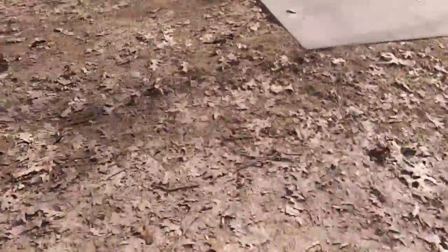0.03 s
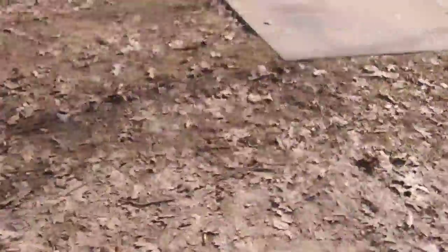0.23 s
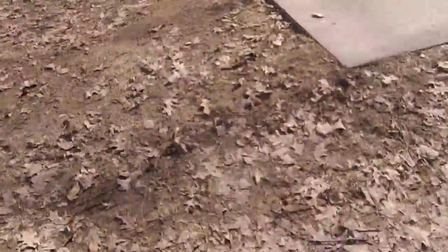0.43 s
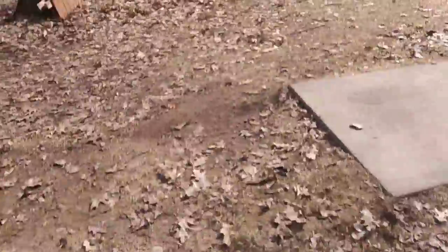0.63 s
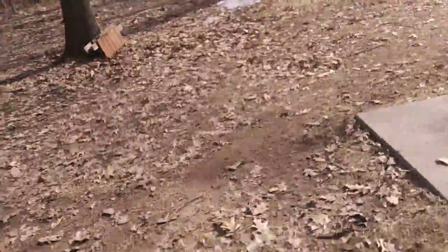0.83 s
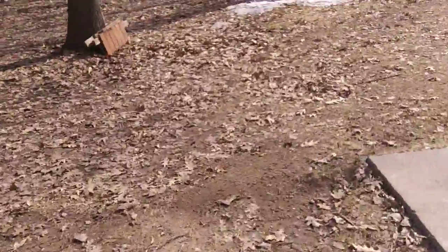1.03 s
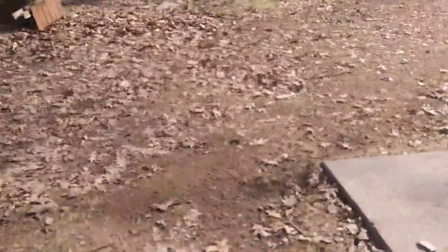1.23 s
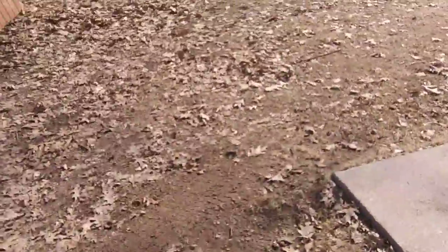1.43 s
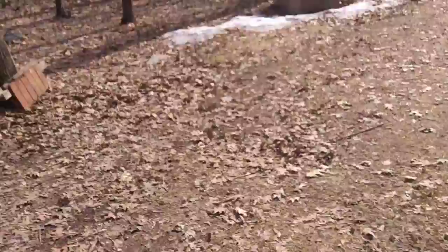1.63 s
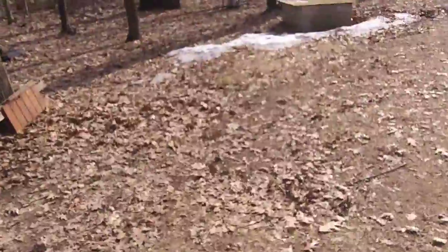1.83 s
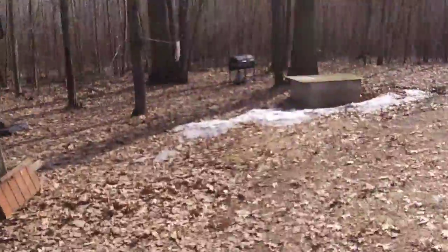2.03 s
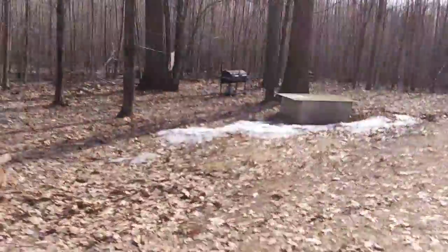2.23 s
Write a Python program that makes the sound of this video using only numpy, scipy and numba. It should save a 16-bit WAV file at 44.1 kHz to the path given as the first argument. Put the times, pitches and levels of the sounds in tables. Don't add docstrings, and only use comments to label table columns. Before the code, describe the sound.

Footsteps crunch dry leaves in a quiet leafy yard. A small click near 0.1 s precedes a sharp crunch at 0.23 and a duller, lower one around 0.37. From 0.55 to 1.4 s, brittle stems snap in irregular ticks. Soft rustling swells near 1.7, a firm crunch comes at 1.98, and a bright, chattering tread lands around 2.23. Thin small-microphone sound, faint hiss.

```python
import sys
import numpy as np
from scipy import signal
from scipy.fft import rfft, irfft
from scipy.io import wavfile
from numba import njit

SR = 44100
rng = np.random.default_rng(int(sys.argv[2]) if len(sys.argv) > 2 else 0)


def waveform_to_disk(signal):
    frames = np.transpose(np.atleast_2d(signal))
    scaled = np.clip(frames, -1, 1) * 32767
    samples = np.round(scaled).astype(np.int16)
    wavfile.write(sys.argv[1], SR, samples)


def voltage_ratio(decibels):
    exponent = np.asarray(decibels, float) / 20
    return 10 ** exponent


N = 100592


def highpass(x, hz, q):
    w = 2 * np.pi * hz
    b, a = signal.bilinear([1, 0, 0], [1, w / q, w * w], SR)
    return signal.lfilter(b, a, x)


@njit
def ring(n, start, step, decay, rise, size):
    y = np.zeros(n)
    for k in range(len(start)):
        z, soft = size[k] + 0j, 1.
        turn, soft_fall = np.exp(1j * step[k] - decay[k]), np.exp(-1 / rise[k])
        for i in range(start[k], min(start[k] + int(5 / decay[k]), n)):
            y[i] += z.imag * (1 - soft)
            z, soft = z * turn, soft * soft_fall
    return y


# (peak time [s], level [dB], rise [s per 20 dB], fall [s per 20 dB], centre [Hz])
CRUSHED_LEAVES = [(.005, -43, .01, .05, 300), (.228, -26, .012, .025, 2500), (.21, -43, .06, .03, 3600),
                  (.241, -37, .02, .025, 2400), (.23, -42, .12, .08, 450), (.278, -42, .04, .05, 800),
                  (.36, -32, .07, .03, 900), (.375, -31, .02, .02, 700), (.46, -44, .07, .04, 2200),
                  (.92, -58, .06, .04, 1700), (1.5, -55, .4, .6, 4200), (1.75, -49, .03, .2, 180),
                  (1.968, -42, .01, .03, 900), (1.995, -37, .02, .009, 3200), (1.71, -44, .05, .07, 3300),
                  (1.632, -50, .005, .03, 700), (.412, -38, .08, .03, 800), (.452, -38, .04, .05, 700),
                  (.08, -56, .3, .3, 4000), (.65, -45, .03, .06, 600), (.73, -42, .04, .08, 900),
                  (.815, -46, .08, .03, 1200), (.96, -50, .03, .06, 900), (1.17, -48, .05, .03, 2000),
                  (1.205, -41, .015, .1, 2800), (1.26, -42, .05, .06, 2500), (1.31, -41, .01, .02, 1200),
                  (1.35, -48, .02, .05, 2000), (1.562, -48, .02, .05, 3000), (1.638, -46, .015, .08, 4000),
                  (1.668, -44, .04, .1, 4200), (1.828, -44, .02, .07, 2600), (1.983, -37, .02, .03, 2600),
                  (2.05, -51, .06, .12, 500), (2.185, -38, .04, .08, 2600), (2.208, -36, .02, .015, 1800),
                  (2.248, -32, .035, .035, 2200), (2.24, -44, .1, .05, 450)]
# (peak time [s], level [dB], rise [s per 20 dB],
# fall [s per 20 dB], centre [Hz])
CHATTERING_LEAVES = [(2.23, -17, .025, .004, 4800), (2.243, -22, .03, .02, 4800),
                     (2.263, -25, .03, .025, 4100), (2.28, -28, .02, .02, 4800),
                     (2.185, -32, .045, .05, 4700), (2.245, -30, .09, .07, 6300),
                     (1.988, -31, .03, .025, 6200), (1.7, -37, .12, .08, 6800),
                     (.227, -30, .012, .006, 6500), (.234, -25, .004, .01, 3700),
                     (2.06, -44, .12, .05, 4900), (2.1, -38, .006, .006, 3500),
                     (2.127, -36, .003, .004, 4000)]
# (peak time [s], level [dB], rise [s per 20 dB], fall [s per 20 dB])
EDGE_RUSTLES = [(.0, -50, .01, .15), (.229, -34, .02, .012), (.378, -39, .09, .04), (.46, -44, .08, .06),
                (.75, -54, .3, .3), (.96, -52, .04, .05), (1.22, -49, .03, .25), (1.36, -46, .04, .12),
                (1.57, -47, .15, .08), (1.7, -36, .13, .1), (1.86, -43, .1, .1), (1.99, -31, .05, .025),
                (2.04, -45, .05, .12), (2.25, -35, .13, .1)]
GRAIN_COUNT, GRAIN_CYCLES = 60000, 2.5
GRAIN_GAIN_DB, GRAIN_SCATTER_DB = -3.5, 2.8
CLUMP_DB, CLUMPS_PER_S = 2.2, 300
SPREAD_OCT, CHATTER_OCT, RUSTLE_HZ = .85, .14, 11500
SKIRT_DB, SKIRT_FALL = -13, 2.2
LITTER_DB, LITTER_HZ, THIN_HZ = -63, 450, 280
CLOUD_DB, CLOUD_RISE_S, CLOUD_LONGER = -12, .002, 1.2


def crunch():
    u = rng.random((GRAIN_COUNT, 4)).T
    t = u[0] * N / SR
    hz = 150 + 16000 * u[1] ** 2

    def bell(centre, octaves):
        return np.exp(-np.log2(hz / centre) ** 2 / (2 * octaves ** 2))

    def near(centre, octaves=SPREAD_OCT):
        skirt = np.minimum(hz / centre, 1) / (1 + hz / centre / SKIRT_FALL)
        return bell(centre, octaves) + voltage_ratio(SKIRT_DB) ** 2 * skirt

    def swell(s, db, rise, fall):
        return voltage_ratio(db - 20 * np.where(t < s, (s - t) / rise, (t - s) / fall)) ** 2

    power = voltage_ratio(LITTER_DB) ** 2 * near(LITTER_HZ)
    for *shape, centre_hz in CRUSHED_LEAVES:
        power = power + swell(*shape) * near(centre_hz)
    for shape in EDGE_RUSTLES:
        power = power + swell(*shape) * near(RUSTLE_HZ, SPREAD_OCT / 2)
    for s, db, centre_hz, t60_ms in RINGING_LEAVES[1:]:
        cloud = swell(s, db + CLOUD_DB, CLOUD_RISE_S, CLOUD_LONGER * t60_ms / 1000)
        power = power + cloud * near(centre_hz)
    for *shape, centre_hz in CHATTERING_LEAVES:
        power = power + swell(*shape) * bell(centre_hz, CHATTER_OCT)

    scatter = voltage_ratio(GRAIN_GAIN_DB - GRAIN_SCATTER_DB * np.log(1.002 - u[2])) * np.sign(u[3] - .5)
    clump_gain = voltage_ratio(CLUMP_DB * rng.standard_normal((N // 100, 8)))
    clump = clump_gain[(t * CLUMPS_PER_S).astype(int), np.log2(hz / 100).astype(int)]
    tilt = (hz / 1000) ** .25 * np.minimum(hz / THIN_HZ, 1)
    size = clump * np.sqrt(power) * tilt * scatter
    start = (t * SR).astype(np.int64)
    return ring(N, start, 2 * np.pi * hz / SR, 2 * hz / SR / GRAIN_CYCLES, SR / hz / 2, size)


# (time [s], push level [dB], push length [ms], crack level [dB])
SNAPPING_STEMS = [(0.5447, -29, 0.27, -55), (0.5758, -33, 0.2, -57), (0.5843, -27, 0.29, -57),
                  (0.5965, -29, 0.35, -57), (0.5983, -24, 0.27, -51), (0.5996, -22, 0.2, -44),
                  (0.6142, -44, 0.2, -68), (0.6373, -32, 0.16, -58), (0.6464, -33, 0.35, -59),
                  (0.6487, -38, 0.16, -58), (0.6511, -37, 0.35, -57), (0.6596, -40, 0.11, -61),
                  (0.6698, -21, 0.16, -53), (0.6743, -33, 0.16, -46), (0.6834, -22, 0.16, -37),
                  (0.7138, -23, 0.16, -39), (0.7163, -13, 0.18, -33), (0.7305, -22, 0.16, -39),
                  (0.7361, -33, 0.18, -59), (0.752, -15, 0.16, -27), (0.7583, -31, 0.14, -40),
                  (0.7682, -33, 0.14, -41), (0.7816, -29, 0.14, -40), (0.7864, -29, 0.16, -41),
                  (0.8272, -34, 0.25, -41), (0.8288, -32, 0.14, -40), (0.8329, -17, 0.16, -31),
                  (0.8722, -40, 0.25, -61), (0.9423, -19, 0.2, -57), (0.9913, -18, 0.16, -29),
                  (1.028, -15, 0.18, -37), (1.0398, -39, 0.18, -54), (1.0475, -32, 0.14, -40),
              (1.0612, -42, 0.07, -50), (1.0707, -16, 0.14, -26), (1.1355, -21, 0.14, -32),
              (1.1391, -20, 0.16, -31), (1.1531, -23, 0.18, -41), (1.1785, -24, 0.16, -47),
              (1.1886, -12, 0.16, -52), (1.2012, -26, 0.14, -38), (1.261, -27, 0.14, -48),
              (1.2972, -38, 0.11, -45), (1.3089, -34, 0.14, -60), (1.3456, -37, 0.05, -42),
              (1.3487, -29, 0.07, -37), (1.3506, -17.5, 0.11, -38), (1.3566, -33, 0.16, -51),
              (1.3645, -32, 0.14, -51), (1.3682, -36, 0.16, -55), (1.3718, -34, 0.07, -43),
              (1.3789, -33, 0.05, -39), (1.5631, -28, 0.07, -44), (1.8094, -39, 0.07, -41),
              (1.8186, -52, 0.07, -45), (1.9312, -28, 0.07, -32), (2.066, -36, 0.07, -37),
              (2.1076, -36, 0.05, -36), (2.1266, -40, 0.11, -46), (2.2101, -20, 0.14, -31)]
# (time [s], push level [dB], push length [ms], crack level [dB])
KNOCKED_TWIGS = [
    (.3636, -28, .22, -60),
    (.4507, -30, .4, -70),
    (1.9803, -18, .2, -50),
    (2.2452, -22, .14, -45),
    (2.2476, -23, .22, -50),
    (.3793, -31, .2, -60),
    (.9835, -42, .15, -55),
    (.9865, -40, .2, -58),
    (1.6085, -40, .1, -60),
    (1.5565, -35, .14, -52),
]
PUSH_RISE, PUSH_FALL, SMEAR_MS = .75, 1.9, .105
DULL_MS_PER_DB = .0025
CRACK_GAIN_DB = 14


def snaps():
    y, k = np.zeros(N), np.arange(-64, 65)
    for s, db, ms, crack_db in [*SNAPPING_STEMS, *KNOCKED_TWIGS]:
        at = int(s * SR)
        late = k - s * SR % 1
        ms = max(ms - SMEAR_MS + DULL_MS_PER_DB * (db - crack_db), .03)
        width = ms * SR / 1000 * np.where(late < 0, PUSH_RISE, PUSH_FALL)
        y[at + k] += voltage_ratio(db) * (1 + ms / .25) * np.exp(-(late / width) ** 2)
        crack = (np.sinc(late) - .25 * np.sinc(late * .25)) * np.hanning(len(k))
        y[at + k] += voltage_ratio(crack_db + CRACK_GAIN_DB) * crack
    return highpass(y, 330, .85)


# (time [s], peak level [dB], pitch [Hz], t60 [ms])
RINGING_LEAVES = [(.077, -20, 4570, 7), (.103, -41, 4200, 6), (.111, -31, 3200, 4), (.2287, -10, 4300, 4),
                  (.2282, -16, 3300, 5), (.3697, -18, 1200, 4), (.3722, -23, 900, 5), (.445, -34, 900, 8),
                  (1.755, -42, 210, 40), (1.71, -46, 200, 40), (1.775, -36, 5400, 5), (2.21, -18, 6400, 5),
                  (1.9535, -43, 4100, 8), (.8715, -44, 4500, 6), (1.73, -38, 3500, 5),
                  (1.171, -21, 3200, 4), (1.1712, -24, 2000, 4), (1.4825, -38, 3000, 8),
                  (1.673, -30, 1240, 14), (1.6865, -29, 4700, 7), (1.734, -34, 210, 40),
                  (1.775, -34, 1100, 8), (1.776, -33, 3440, 6), (1.8195, -35, 460, 15),
                  (1.848, -30, 1620, 10), (1.9165, -37, 4080, 7), (1.946, -37, 1900, 7),
                  (1.979, -27, 1200, 5), (2.248, -27, 2500, 12), (2.2475, -30, 480, 12),
                  (2.249, -22, 4700, 12)]


def rings():
    s, db, hz, t60_ms = np.array(RINGING_LEAVES).T
    decay = np.log(1000) / (t60_ms * SR / 1000)
    rise = .3 * SR / 1000 * t60_ms / 6
    return ring(N, (s * SR).astype(np.int64), 2 * np.pi * hz / SR, decay, rise, 1.5 * voltage_ratio(db))


# (frequency [Hz], density [dB per Hz])
HUSH_SPECTRUM = [(24, -30), (60, -32), (215, -8), (1270, -24), (1950, -17), (3500, -16), (5600, -28),
                 (16000, -29)]


def air():
    hz, db = np.array(HUSH_SPECTRUM).T
    f = np.arange(N // 2 + 1) * SR / N + 1
    gain = voltage_ratio(np.interp(np.log(f), np.log(hz), db))
    y = irfft(rfft(rng.standard_normal(N)) * gain, N)
    return y / y.std() * voltage_ratio(-65.5)


def scene():
    return (crunch() + snaps() + rings())[None]


def colour(x, points):
    hz, db = np.array(points).T
    f = np.arange(1025) * SR / 2048 + 1
    cepstrum = irfft(np.log(voltage_ratio(np.interp(np.log(f), np.log(hz), db))))
    cepstrum[1:1024] *= 2
    impulse = irfft(np.exp(rfft(cepstrum[:1024], 2048)))[None, :512]
    return signal.fftconvolve(x, impulse)[:, :N]


# (frequency [Hz], gain [dB])
TREBLE_STEP = [(4200, 0), (4950, -2), (5500, -9), (6000, -12), (7000, -13), (7900, -17), (9000, -10),
               (12000, -7)]
BASS_Q = .9


def microphone(x):
    x = highpass(highpass(x, 190, BASS_Q), 110, .7)
    presence = signal.lfilter(*signal.iirpeak(4600, 2.5, fs=SR), x)
    x = x + (voltage_ratio(3.5) - 1) * presence
    return colour(x, TREBLE_STEP)


def top_cut(x):
    return signal.sosfilt(signal.butter(12, 16820, fs=SR, output="sos"), x)


def record(dry):
    x = microphone(dry) + highpass(air(), 30, BASS_Q)
    x = signal.sosfilt(signal.ellip(8, .3, 70, 16200, fs=SR, output="sos"), x)
    return top_cut(x)


dry = scene()
out = record(dry)
waveform_to_disk(out)
```